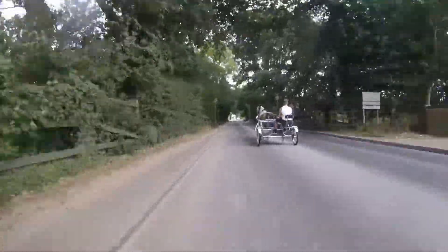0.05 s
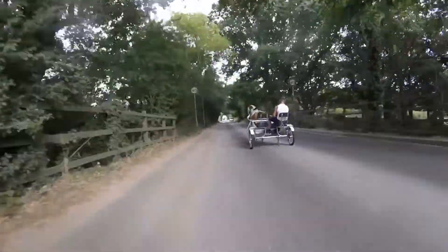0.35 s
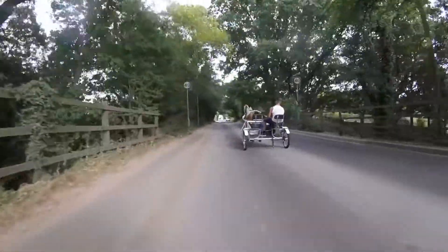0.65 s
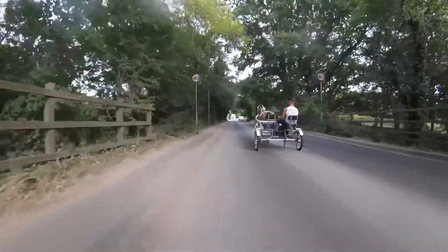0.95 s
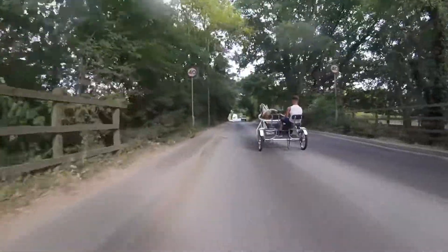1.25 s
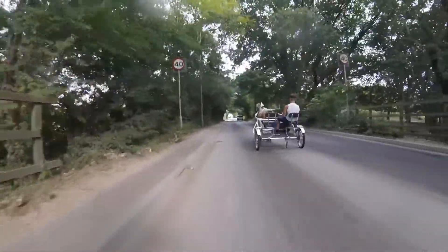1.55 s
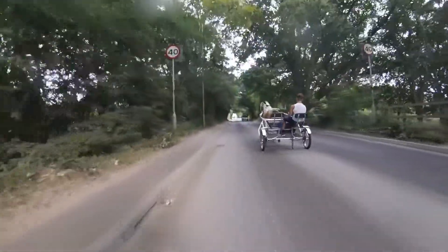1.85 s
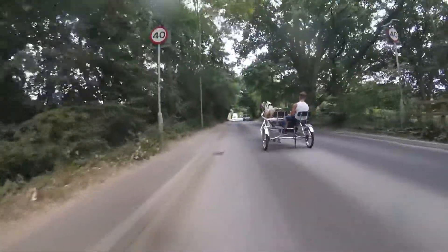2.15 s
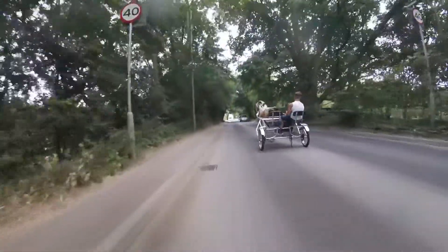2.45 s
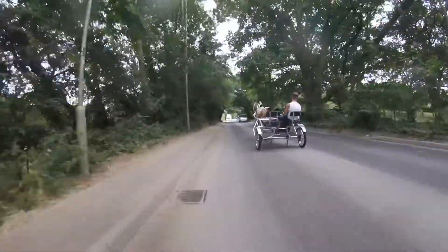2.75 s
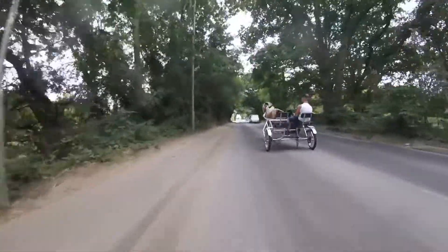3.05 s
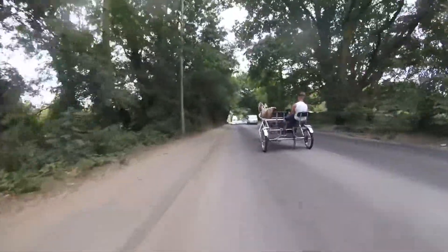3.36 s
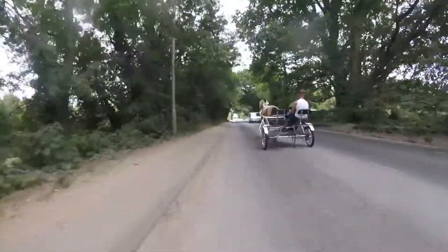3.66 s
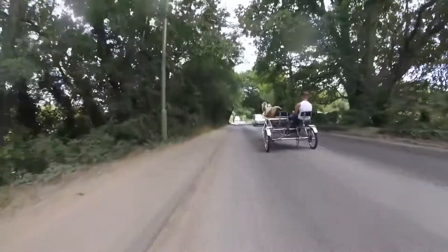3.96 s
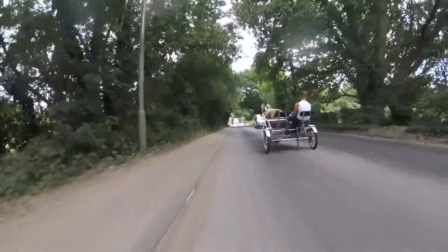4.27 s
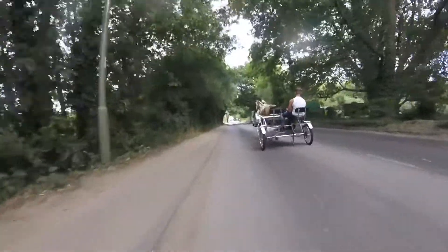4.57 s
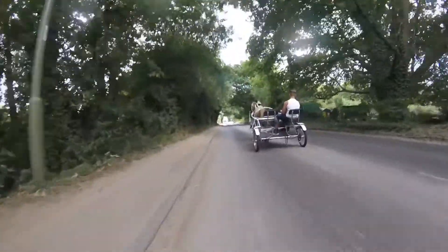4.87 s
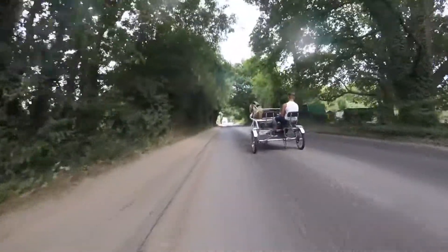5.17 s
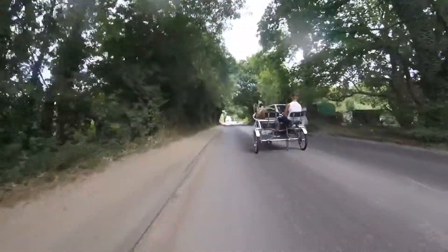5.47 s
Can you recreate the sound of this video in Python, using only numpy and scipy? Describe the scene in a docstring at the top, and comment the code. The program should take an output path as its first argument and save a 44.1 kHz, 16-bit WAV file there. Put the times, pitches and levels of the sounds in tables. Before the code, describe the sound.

The sound starts abruptly at about 0.3 seconds with heavy, low wind rumbling and fluttering on a microphone carried by a moving bicycle. Ahead, a shod horse trots on tarmac. Its hooves land in close pairs, about four pairs a second, each a hollow clop with a bright metallic click and a short echo from the roadside trees. Faint scuffs and chinks of the shoes fall between the beats. The tyres hum softly, with a faint note from about 1.2 to 2.5 seconds. Harder wind buffets come between 2.3 and 3.6 seconds. Near 3.8 seconds the sound dips for an instant and the bicycle jolts with a dull thump and small ticks. The wind and hooves are then somewhat softer. Around 4.8 to 5.1 seconds loose parts rattle lightly under another gust. The trotting and wind continue to the end, at about 5.6 seconds.

```python
"""A trotting horse ahead of a bicycle

Shod hooves land in close pairs on a tarmac lane, scuff the grit and echo between hedges and trees.
The bicycle behind carries the microphone, which the wind buffets. Its tyres hum and crackle on
the road, and its loose parts rattle over rough patches."""
import sys
import numpy as np
from scipy import signal
from scipy.fft import rfft, irfft
from scipy.io import wavfile
from scipy.ndimage import uniform_filter1d

SR = 44100
rng = np.random.default_rng(int(sys.argv[2]) if len(sys.argv) > 2 else 0)


def transcribe(u):
    """Save the signal u as a 16-bit wav file named by the first command-line argument.

    u: samples, shape (n,) or (channels, n), limited to [-1, 1]; the rate is SR.
    q: integer samples, one column per channel.
    """
    v = np.clip(np.atleast_2d(u).T, -1, 1)
    q = np.round(v * 32767).astype(np.int16)
    wavfile.write(sys.argv[1], SR, q)


N = 247842


def gain_of(db):
    """Turns decibels into a number to multiply a sound by."""
    return 10 ** (np.asarray(db) / 20)


def at_level(x, db=0, first=None):
    """Sets the average (rms) level of a sound, judged on its first samples or on all of it."""
    return gain_of(db) * x / np.sqrt(np.mean(x[:first] ** 2) + 1e-20)


def tone_gain(points, hz):
    """The gain at each frequency, from a table of frequencies and levels."""
    known_hz, db = np.transpose(points)
    return gain_of(np.interp(np.log(hz + 1), np.log(known_hz + 1), db))


def curve(points):
    """Joins points in time with straight lines, giving a value for every sample."""
    return np.interp(np.arange(N) / SR, *np.transpose(points))


def swells(rows):
    """The power of smooth swells, one for each (middle [s], length [s], level [dB])."""
    t = np.arange(N) / SR
    return sum(gain_of(db) ** 2 * np.exp(-2 * np.pi * ((t - s) / length) ** 2) for s, length, db in rows)


def add(mix, s, sound):
    """Mixes a sound in, starting at s seconds."""
    part = mix[round(s * SR):][:len(sound)]
    part += sound[:len(part)]


def noise(tone):
    """Steady noise with the given balance of low and high frequencies."""
    white = rfft(rng.standard_normal(N))
    return at_level(irfft(white * tone_gain(tone, np.fft.rfftfreq(N, 1 / SR)), N))


def wander(hz):
    """A random wobble of about size 1, no faster than about hz."""
    white = rfft(rng.standard_normal(N))
    return at_level(irfft(white / (1 + (np.fft.rfftfreq(N, 1 / SR) / hz) ** 4), N))


def steadied(x, samples=5000):
    """Takes the slow swells out of a noise and keeps its quick lumps."""
    return x / np.sqrt(uniform_filter1d(x ** 2, samples) + 1e-9)


def ring(x, hz, *widths_hz):
    """Makes a sound ring at one pitch, once for each width; a narrow width rings longer."""
    for width in widths_hz:
        x = signal.lfilter(*signal.iirpeak(hz, hz / width, SR), x)
    return x


def burst(decay_s, rise_s, roughness):
    """The force of two things touching: a quickly dying crunch of uneven grains."""
    t = np.arange(4096) / SR
    grains = rng.standard_normal(len(t)) * np.exp(roughness * rng.standard_normal(len(t)))
    return grains * (1 - np.exp(-t / rise_s)) * np.exp(-t / decay_s)


# How strongly the air flows over the microphone: (time [s], level [dB])
AIRFLOW = [(0.35, 5), (0.45, 2.5), (0.56, 1), (0.75, 1.5), (1.0, -0.5), (1.55, 1.06), (2.2, 1), (2.65, 0.5),
           (3.25, 2), (3.7, 0.5), (3.81, -5), (4.17, -5), (4.33, -3.5), (4.6, -3), (5.12, -2.5), (5.24, -4),
           (5.45, -4.5), (5.62, -3)]

def follow_airflow(db, slope=1, extra_power=0):
    """A gain that starts from db and moves by slope dB for each dB of airflow, plus any swells."""
    return np.sqrt(gain_of(db + slope * curve(AIRFLOW)) ** 2 + extra_power)


# The tone of each part of the wind: (frequency [Hz], relative level [dB])
GUST_TONE = [(8, -35.5), (20, -10.5), (30, -4), (40, 1.5), (50, 2.5), (62, -5.5), (90, -38.5), (200, -89)]
THUMP_TONE = [(35, -30.5), (60, 0), (75, 0), (85, 8), (94, -1.5), (106, -1.5), (130, -12.5), (200, -29.5),
              (400, -86.5)]
FLUTTER_TONE = [(80, -4.5), (135, 2.5), (165, 1.5), (195, -0.5), (220, 0.5), (243, 3.5), (275, -14.5),
                (310, -10), (345, -20), (400, -18), (470, -34), (1000, -38.5), (4000, -82)]
HISS_TONE = [(400, -5.5), (1000, -4), (1400, 3), (1900, 0), (2500, -0.5), (3300, -8.5), (4300, -11.5),
             (5200, -5), (6500, -7), (7300, -17), (10000, -31), (12500, -51)]
# Slow gusts, then single hard buffets of air: (middle [s], length [s], level [dB])
GUSTS = [(0.68, .4, -13), (1.55, .35, -16), (1.98, .22, -13), (3.44, .18, -15), (4.01, .08, -15),
         (4.92, .36, -10), (5.42, .3, -17)]
BUFFETS = [(2.29, .14, -12), (2.7, .3, -12.5), (3.1, .12, -14), (3.34, .1, -12), (3.63, .15, -12),
           (4.31, .08, -18), (4.45, .1, -19), (4.8, .1, -16), (5.13, .12, -15), (5.48, .15, -12)]
# Lulls in which the buffeting drops away: (middle [s], length [s])
LULLS = [(.535, .05), (1.17, .07), (2.94, .09), (3.9, .1), (4.19, .13), (4.385, .04), (4.58, .07),
         (5.25, .06)]

def wind(eddies):
    """Swirls of air (eddies) hit the microphone, making it rumble, thump, flutter and hiss."""
    buffets = swells(BUFFETS)
    lull = swells((s, length, 0) for s, length in LULLS)
    gusts = steadied(noise(GUST_TONE)) * np.sqrt(gain_of(-18) ** 2 + swells(GUSTS))
    thumps = steadied(noise(THUMP_TONE), samples=4400)
    thumps *= follow_airflow(db=-13.5, slope=0.88, extra_power=buffets)
    flutter = steadied(noise(FLUTTER_TONE) * gain_of(1.9 * eddies))
    flutter *= follow_airflow(db=-17.5, slope=1.39, extra_power=gain_of(-22.5) ** 2 * buffets)
    hiss = noise(HISS_TONE) * gain_of(2 * eddies) * follow_airflow(db=-54)
    surge_db = 1.5 * wander(hz=6.4)
    rumble = (gusts + thumps) * gain_of(surge_db - 8 * lull)
    return rumble + flutter * gain_of(-3 * lull) + hiss


# The tone of the tyres' roar: (frequency [Hz], relative level [dB])
ROAR_TONE = [(300, -7.5), (490, -3), (590, 0), (635, 4), (690, 0), (800, -3.5), (1000, -17), (1500, -30),
             (4000, -63.5)]
# Stretches of tarmac where the tyres get louder: (middle [s], length [s], singing [dB], roar [dB])
LOUD_STRETCHES = [(1.216, 0.22, -35, -34.5), (1.443, 0.095, -38, -34.5), (1.675, 0.2, -53, -34.5),
                  (2.062, 0.27, -33, -35.5), (2.43, 0.18, -40.5, -38), (5.123, 0.035, -53, -32.5)]
# The note the tread sings: (time [s], pitch [Hz])
TREAD_PITCH = [(1.25, 573), (1.45, 557), (2.0, 560), (2.13, 581), (2.45, 573.5)]

def tyres(eddies):
    """The tyres' roar flutters with the air; the tread murmurs a note that clears on some stretches."""
    roar_power = swells((s, length, db) for s, length, _, db in LOUD_STRETCHES)
    singing_power = swells((s, length, db) for s, length, db, _ in LOUD_STRETCHES)
    roar = steadied(noise(ROAR_TONE) * gain_of(1.9 * eddies))
    roar *= follow_airflow(db=-39.5, extra_power=roar_power)
    murmur = steadied(ring(rng.standard_normal(N), 579, 26, 55), samples=3000)
    pitch_hz = curve(TREAD_PITCH) + 5 * wander(hz=25)
    note = np.sin(2 * np.pi * np.cumsum(pitch_hz) / SR)
    singing = at_level(note * gain_of(2 * wander(hz=20))) * np.sqrt(singing_power)
    return roar + murmur * follow_airflow(db=-47) + singing


# A bit of grit flicked up by a wheel: (time [s], level [dB])
FLICKS = [(3.983, -50.5)]

def grit(grains_per_s=180, spread_db=9.5):
    """Fine grit crackles under the wheels, louder at speed, and one bit flies up with a bright tick."""
    sizes = gain_of(spread_db * np.minimum(rng.exponential(1, N), 4))
    grains = rng.standard_normal(N) * sizes * (rng.random(N) < grains_per_s / SR)
    crackle = ring(ring(grains, 6900, 2500), 7900, 4000)
    out = at_level(crackle) * follow_airflow(db=-73)
    for s, db in FLICKS:
        force = burst(decay_s=.0012, rise_s=.0003, roughness=.6)
        add(out, s, at_level(ring(force, 6200, 1200, 2000), db, first=176))
    return out


def jolt(start_s=3.781, hz=50, decay_s=.014, db=-3):
    """Entering a rough patch, the frame bounces once or twice and shakes the microphone."""
    out, t = np.zeros(N), np.arange(SR // 4) / SR
    rise_and_fall = (t / decay_s * np.exp(1 - t / decay_s)) ** 2
    add(out, start_s, gain_of(db) * rise_and_fall * np.sin(2 * np.pi * hz * t))
    return out


# Knocks of the bicycle's loose parts: (time [s], level [dB], share of dry crack [0-1])
RATTLES = [(1.8385, -42, 0.4), (3.7345, -45, 0.7), (3.776, -45, 0), (3.79, -41.5, 0), (4.817, -45, 0),
           (4.8237, -38, 0.76), (4.855, -51, 0.6), (4.865, -45.5, 0.2), (4.873, -47.5, 0.1),
           (4.887, -40.5, 0.3), (4.918, -51, 0), (4.94, -44.5, 0.05), (5.018, -47, 0), (5.115, -45, 0.03)]
# The notes a loose part rings with: (pitch [Hz], width [Hz], relative level [dB])
RATTLE_NOTES = [(1350, 500, -3), (2100, 700, 0), (5150, 700, -5), (6400, 800, -12)]

def rattles():
    """Loose parts tick and crack close to the microphone, each a little different in pitch."""
    out = np.zeros(N)
    soften = signal.butter(4, 5600, fs=SR, output="sos")
    tap = at_level(signal.unit_impulse(4096))
    for s, db, crack_share in RATTLES:
        force = .6 * tap + at_level(burst(decay_s=.0016, rise_s=.0004, roughness=.6))
        tuning = rng.uniform(.92, 1.06)
        notes = sum(gain_of(note_db) * ring(force, hz * tuning, width, 2 * width)
                    for hz, width, note_db in RATTLE_NOTES)
        tick, crack = signal.sosfilt(soften, [notes, ring(tap, 2000, 5000)])
        knock = (1 - crack_share) * at_level(tick) + crack_share * at_level(crack)
        add(out, s, at_level(knock, db, first=176))
    return out


# The tone of the echo within each band: (frequency [Hz], relative level [dB])
ECHO_TONE = [(400, -25.5), (1100, 11.5), (1400, 4), (1900, 2.5), (2600, -4), (3300, -6), (4300, -7.5),
             (5100, -1.5), (5700, -6), (6550, 10), (7100, -9), (8500, -16), (10000, -21), (12000, -27)]
# The echo's bands: (low edge [Hz], high edge [Hz], time to fade 60 dB [s], level against source [dB])
ECHO_BANDS = [(850, 1880, 0.081, -5.5), (2030, 4210, 0.19, -7), (4460, 6330, 0.2, -5),
              (7140, 21700, 0.31, 3)]

def tree_echo(sound, rise_s=.013):
    """Countless leaves and trunks scatter each beat into a smooth wash that dies away band by band."""
    out, t, wash = np.zeros(N), np.arange(SR) / SR, noise(ECHO_TONE)
    for low_hz, high_hz, fade_s, db in ECHO_BANDS:
        band = signal.butter(5, [low_hz, high_hz], "band", fs=SR, output="sos")
        tail = gain_of(-60 * t / fade_s) ** 2 * (1 - np.exp(-t / rise_s))
        power = signal.fftconvolve(signal.sosfilt(band, sound) ** 2, tail / tail.sum())[:N]
        out += gain_of(db) * np.sqrt(abs(power)) * at_level(signal.sosfilt(band, wash))
    return out * gain_of(1.9 * wander(hz=160))


def roadside_echoes(sound, count=8, db=-26.5):
    """Separate echoes bounce off a cart, a fence and the nearest trunks, shifting as they pass."""
    out, n = np.zeros(N), np.arange(N)
    for delay_s, drift in rng.uniform([.012, -.002], [.09, .002], (count, 2)):
        out += np.interp(n - delay_s * SR - drift * n, n, sound)
    return gain_of(db) * out


# Shoes brushing the road between beats: (time [s], scrape [dB], jingle [dB])
SCUFFS = [(0.433, -61, -50.5), (0.796, -61, -53.5), (1.32, -57, -58), (1.468, -58, -52),
          (1.809, -56, -50.5), (2.132, -54, -52), (2.479, -57, -52), (2.544, -49.5, -64), (2.831, -56, -50),
          (3.176, -58, -48), (3.695, -55.5, -54), (4.049, -67, -53), (4.259, -60, -52), (4.742, -53.5, -60)]
# The notes a lifted shoe rings with: (pitch [Hz], width [Hz], relative level [dB])
SHOE_NOTES = [(2560, 110, 0), (3160, 110, 0), (3900, 140, -1.5), (5250, 160, -5.5), (6200, 140, -4)]

def scuffs(beats, slide_lead_s=.0087, slide_db=-18):
    """A shoe slides on the grit just before landing; between beats it brushes the road and jingles."""
    out = np.zeros(N)
    brushes = [(s, db) for s, db, _ in SCUFFS]
    slides = [(s - slide_lead_s, strike_db + slide_db) for s, *_, strike_db, _, _ in beats]
    for s, db in brushes + slides:
        force = burst(decay_s=.0084, rise_s=.0033, roughness=1)
        scrape = ring(ring(force, 2500, 1800), 2000, 2200)
        hiss = ring(ring(force, 4500, 1400), 5900, 1500)
        add(out, s, at_level(scrape, db, first=882) + at_level(hiss, db + 4.5, first=882))
    for s, _, db in SCUFFS:
        force = burst(decay_s=.012, rise_s=.0022, roughness=.97)
        tuning = rng.uniform(.95, 1.05)
        jingle = sum(at_level(ring(force, hz * tuning, width, 900), note_db, first=882)
                     for hz, width, note_db in SHOE_NOTES)
        add(out, s, at_level(jingle, db, first=882))
    return out


def rocking(blow, gap_s=(.0008, .0016), heel_strengths=(.55, .3)):
    """The shoe does not land flat: the first blow is followed by one from each heel."""
    force = blow.copy()
    delays_s = np.cumsum(rng.uniform(*gap_s, len(heel_strengths)))
    for s, strength in zip(delays_s, heel_strengths):
        add(force, s, strength * at_level(burst(decay_s=.0003, rise_s=.00005, roughness=.5)))
    return force


def chink(force, hz):
    """Steel hits stone and rings with two bright notes."""
    notes = ring(force, 4910, 800) - 1.6 * ring(force, 6400, 290)
    return ring(ring(notes, hz, 3000), 5400, 5400) + 0.11 * force


# One row for each hoof landing: (time [s], clop pitch [Hz], clack pitch [Hz], chink pitch [Hz],
# clop level [dB], shoe strike level [dB], brightness [dB], crack against the strike [dB])
HOOFBEATS = [(0.335, 1130, 2440, 6340, -31.5, -34.5, 2.5, -3.5),
             (0.541, 1080, 2370, 5800, -43.5, -47.5, 3.5, -8),
             (0.595, 1130, 2260, 5300, -38.5, -39, 2, -17), (0.837, 1320, 2700, 5330, -40.5, -40, 3, -4),
             (0.878, 1400, 2540, 6510, -46, -47, -1, -8), (0.892, 1310, 2190, 6040, -48.5, -47.5, 3, 3),
             (1.082, 1150, 2060, 6900, -39.5, -45, 0.5, -16),
             (1.1443, 1070, 2330, 6360, -36.5, -40.5, -2.5, -17),
             (1.3764, 1170, 2570, 4900, -46, -42.5, 2, -18), (1.423, 1120, 2000, 6700, -42.5, -48.5, 1, -1),
             (1.6152, 1250, 2100, 5740, -35.5, -42.5, 3, -10),
             (1.6771, 1280, 2340, 6330, -38.5, -40.5, 1, -8),
             (1.9183, 1420, 2580, 6370, -40.5, -46.5, -0.5, -9),
             (1.968, 1160, 2400, 6100, -41.5, -47.5, 2, -4), (2.154, 1430, 2440, 6380, -31, -39, 1, -14),
             (2.214, 1160, 2680, 5250, -40, -40.5, 4.5, -11.5),
             (2.4562, 1250, 2450, 5300, -44.5, -50, -1, -11),
             (2.51, 1190, 2090, 6300, -43.5, -43.5, 0, -2.5),
             (2.6958, 1340, 2470, 6140, -34, -44.5, 4, -12),
             (2.7629, 1340, 2300, 5670, -35.5, -40, 2.5, -3),
             (3.0035, 1385, 2710, 5430, -33, -39.5, 3.5, -18),
             (3.057, 1165, 2280, 6450, -36, -40.5, 1.5, -4),
             (3.2276, 1320, 2530, 5600, -37, -39.5, 0.5, -5),
             (3.3023, 1210, 2340, 5060, -42, -40, -0.5, -8), (3.543, 1280, 2300, 5420, -53, -40, 4, -5),
             (3.594, 1260, 2470, 5800, -40.5, -43, 4, 1), (3.863, 1330, 2130, 5260, -47.5, -54, 0.5, -3),
             (4.0966, 1350, 2780, 5200, -46, -52, 3.5, -12),
             (4.1452, 1230, 2660, 5240, -46.5, -49.5, 1, -1.5),
             (4.322, 1290, 2520, 6070, -43, -44, -2, -15), (4.401, 1214, 1950, 4800, -44.5, -49, 2.5, -6),
             (4.65, 1510, 2560, 6400, -47, -48.5, 4, -15), (4.703, 1140, 2500, 6100, -39, -47, 0.5, -1.5),
             (4.952, 1290, 2050, 6200, -45, -50.5, 2, -11),
             (5.1932, 1440, 2140, 5060, -42, -47.5, -0.5, -4), (5.2519, 1310, 1970, 6230, -45, -48.5, 5, 1),
             (5.4147, 1445, 1900, 5460, -39, -47, 0.5, -7.5),
             (5.5, 1210, 2340, 6270, -39.5, -44.5, 1.5, -7)]

def hooves(pre_tick_lead_s=(.005, .008)):
    """The hollow hoof clops while its shoe clacks, chinks and cracks on stone."""
    out = np.zeros(N)
    for s, clop_hz, clack_hz, chink_hz, clop_db, strike_db, bright_db, crack_db in HOOFBEATS:
        clack_db, chink_db = strike_db - bright_db, strike_db + bright_db
        blow = at_level(burst(decay_s=.0002, rise_s=.00005, roughness=.3))
        crunch = .3 * at_level(burst(decay_s=.0018, rise_s=.0012, roughness=.7))
        push = at_level(signal.unit_impulse(len(blow))) + crunch  # the horse's weight comes down
        strike = rocking(blow) + crunch
        crack = ring(ring(ring(strike, 3600, 2400), 4000, 3000), 3800, 5000)
        parts = [
            (ring(push, clop_hz, 230, 620, 1100), clop_db),
            (ring(push, 900, 550, 550), strike_db - 6),  # dull knock of the hoof's hard wall
            (ring(push, clack_hz, 250, 1000, 1800), clack_db),
            (chink(strike, chink_hz), chink_db),
            (crack, strike_db + crack_db),
            # the cup of the hoof and the shoe ring on once they are pressed to the road
            (ring(push, clop_hz, 55, 220), clop_db - 13.5),
            (ring(push, clack_hz, 85, 340), clack_db - 13),
            (ring(push, chink_hz, 110, 440), chink_db - 6.5),
        ]
        for part, db in parts:
            add(out, s, at_level(part, db, first=353))
        # a faint bright tick comes just before each strike
        pre_tick = chink(burst(decay_s=.0007, rise_s=.0002, roughness=.7), chink_hz)
        add(out, s - rng.uniform(*pre_tick_lead_s), at_level(pre_tick, chink_db - 13, first=353))
    return out


def scene():
    """Mixes the horse and its echoes with the bicycle and the wind, in one channel."""
    steps, scrapes = hooves(), scuffs(HOOFBEATS)
    echoes = roadside_echoes(steps) + tree_echo(steps + scrapes)
    bicycle = rattles() + jolt() + grit()
    eddies = wander(hz=46.7)  # wind and tyres flutter with the same lumps of air
    return (wind(eddies) + tyres(eddies) + bicycle + echoes + scrapes + steps)[None]


# The sound starts suddenly and later dips once, briefly: (time [s], level [dB])
VOLUME = [(0.3335, -90), (0.3345, 0), (3.736, 0), (3.742, -11), (3.772, -11), (3.778, 0)]
# How well the microphone hears low and high sounds: (frequency [Hz], level [dB])
MIC_TONE = [(20, -4), (9000, 0), (10500, -5), (12000, -15), (15000, -32.5)]

def record(dry, ceiling=1.35, cutoff_hz=15600):
    """The microphone gently squashes the biggest buffets, dulls the treble and cuts off the very top."""
    heard = ceiling * np.tanh(dry / ceiling) * gain_of(curve(VOLUME))
    hz = np.linspace(0, SR / 2, 257)
    dull_treble = signal.firwin2(255, hz, tone_gain(MIC_TONE, hz), fs=SR)
    cut_top = signal.firwin(511, cutoff_hz, window=("kaiser", 9), fs=SR)
    heard = signal.oaconvolve(heard, dull_treble[None], "same")
    return signal.oaconvolve(heard, cut_top[None], "same")


dry = scene()
out = record(dry)
transcribe(out)
```